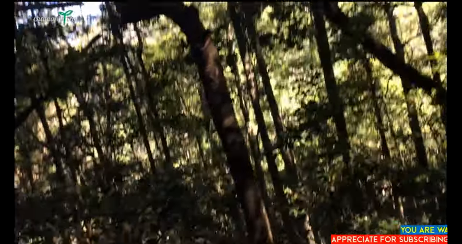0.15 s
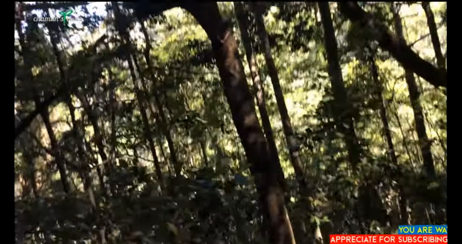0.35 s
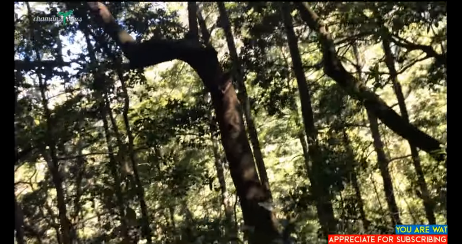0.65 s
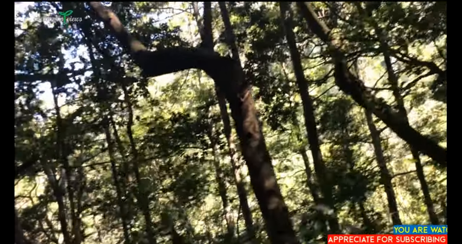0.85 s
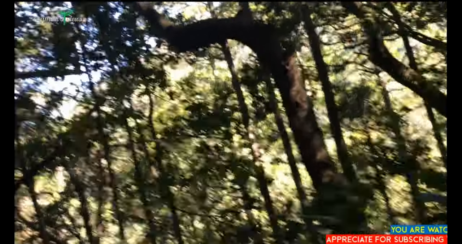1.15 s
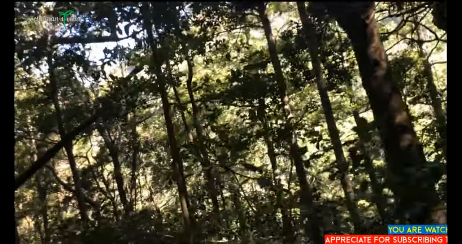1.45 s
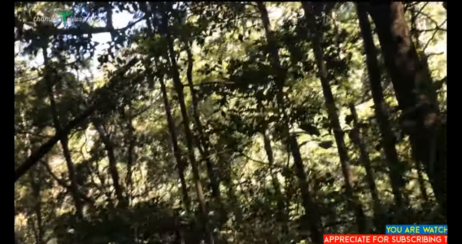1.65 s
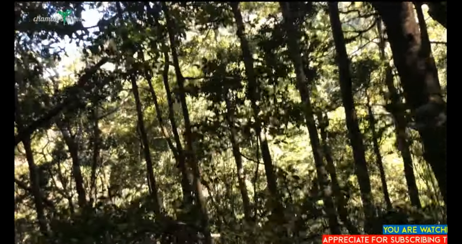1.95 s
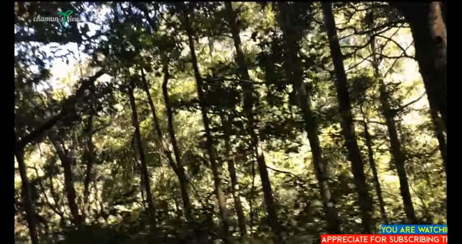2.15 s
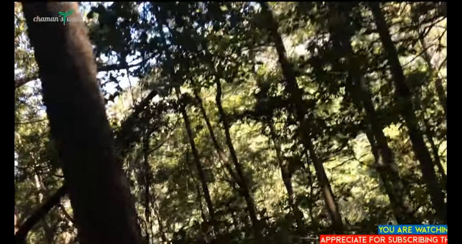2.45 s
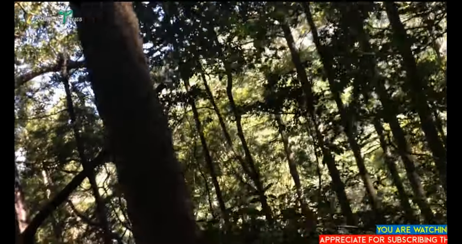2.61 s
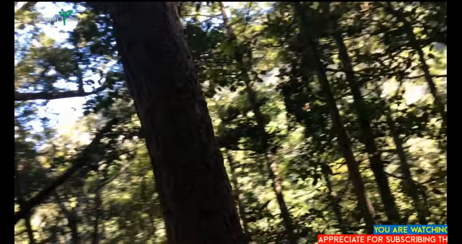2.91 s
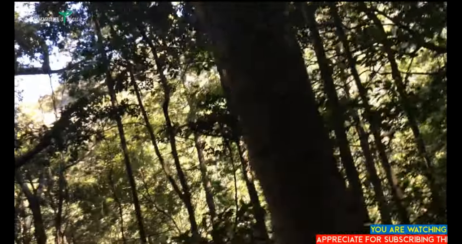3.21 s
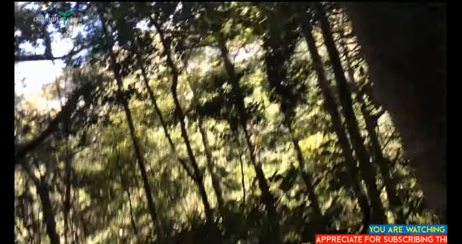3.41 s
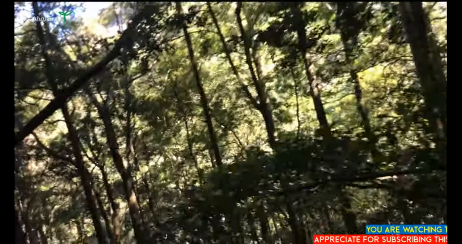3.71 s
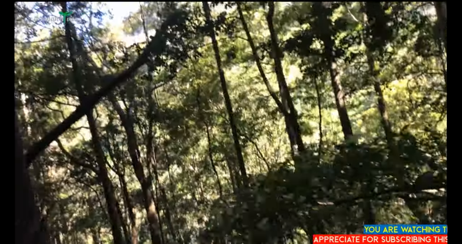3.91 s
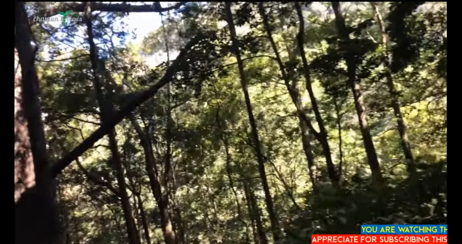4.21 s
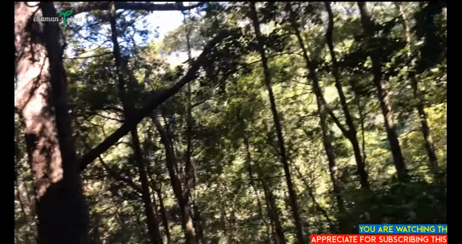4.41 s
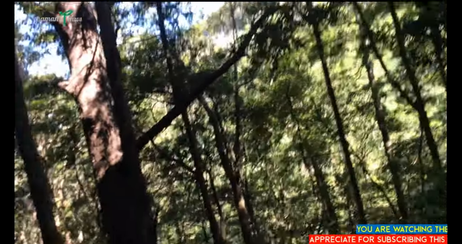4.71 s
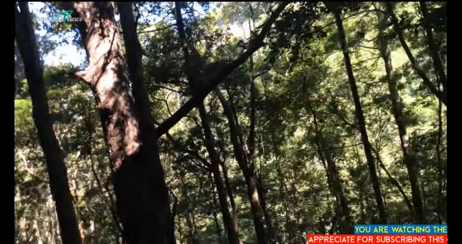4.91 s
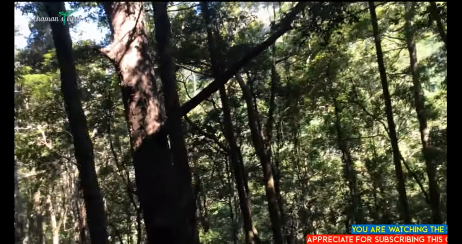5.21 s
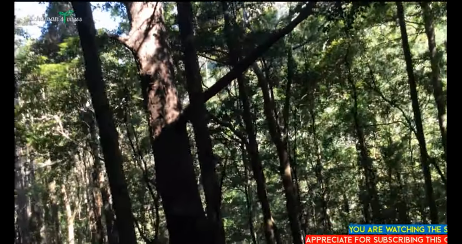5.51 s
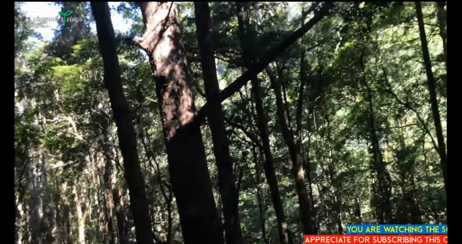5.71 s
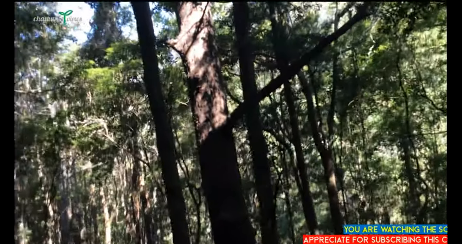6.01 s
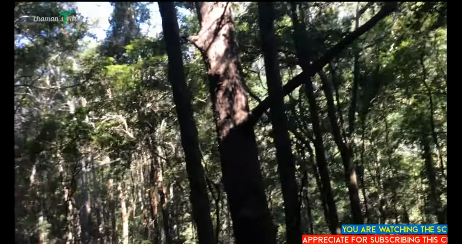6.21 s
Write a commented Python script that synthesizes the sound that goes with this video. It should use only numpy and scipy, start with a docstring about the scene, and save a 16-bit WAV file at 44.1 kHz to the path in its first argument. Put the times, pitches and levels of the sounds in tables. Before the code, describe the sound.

A dense, shrill cicada chorus drones without pause through a rainforest, slowly swelling, with a few faint dull handling thumps on the microphone.

```python
"""A dense, shrill cicada drone runs throughout in a rainforest, swelling all the while, ever more slowly.
Trains of timbal clicks are smeared by forest echoes and shaped by body resonances; the shrillest
group throbs faintly about twice a second. The hand-held camera takes dull bumps, single out-and-back
pulses, a faint three-part scrape of filtered noise and the low rumble of a shifting grip.
Below lie noise bands: a narrow far-off insect hum, canopy air, a low rumble and one soft gust."""
import sys
import numpy as np
from scipy import signal
from scipy.fft import rfft, irfft, next_fast_len
from scipy.io import wavfile
from scipy.ndimage import map_coordinates

SR = 44100
rng = np.random.default_rng(int(sys.argv[2]) if len(sys.argv) > 2 else 0)


def transcribe(signal):
    """Save signal, clipped to [-1, 1], as a 16-bit WAV file at the path in sys.argv[1]."""
    frames = np.atleast_2d(signal).T
    limited = np.clip(frames, -1, 1)
    pcm = np.round(limited * 32767).astype(np.int16)
    wavfile.write(sys.argv[1], SR, pcm)


N = 280035  # length [samples]

# Spectra of the cicada groups, from low to high: (frequency [Hz], relative level per Hz [dB])
LOW_SPECTRUM = [(1300, -58), (1950, -27.5), (2200, -14), (2550, -6), (2790, 0.5), (3030, -0.5),
                (3280, -1.5), (3550, -14), (4200, -67)]
MAIN_SPECTRUM = [(2700, -65), (3150, -9), (3420, -3), (3660, 2.5), (3950, 0.5), (4250, 0.5), (4500, -6),
                 (4800, -30), (5600, -62)]
SHRILL_SPECTRUM = [(3800, -60), (4350, -3), (4660, 2.5), (4950, -2.5), (5260, -5.5), (5540, -6.5),
                   (6000, -12), (6600, -18.5), (7300, -39), (9000, -56)]
OVERTONE_SPECTRUM = [(5000, -45), (6800, -3), (7400, -0.5), (7900, 1.5), (8700, -5), (9400, -5),
                     (10000, -11), (10700, -9), (12500, -12), (13200, -23), (15800, -23)]
# Dull bumps on the camera body: (time [s], peak level [dB], pitch [Hz])
BUMP_EVENTS = [(.151, -48, 64.6), (0.278, -55, 70), (.867, -53, 60), (.94, -61, 65), (1.175, -53, 90),
               (2.822, -47, 78), (3.164, -53, 70), (3.374, -45, 70), (3.64, -51, 55), (3.727, -47, 60),
               (3.83, -47, 65), (3.904, -38, 78), (3.935, -50, 70), (4.012, -50, 55), (4.063, -50, 62),
               (4.163, -53, 80)]
# The three catches of one scrape: (time [s], level [dB], half length [s])
SCRAPE_CATCHES = [(5.047, -52, .006), (5.067, -46.5, .009), (5.126, -53, .005)]
# Spectra of the scraped body and the shifting grip: (frequency [Hz], relative level per Hz [dB])
SCRAPE_SPECTRUM = [(600, -27), (1000, -12), (1200, -9), (1340, -2), (1430, -10), (1530, 2), (1750, -18),
                   (2400, -33)]
GRIP_SPECTRUM = [(20, -8), (40, 0), (80, 1), (160, -20), (400, -50)]
# Spectra of the forest background: (frequency [Hz], relative level per Hz [dB])
HUM_SPECTRUM = [(1100, -45), (1300, -18.5), (1420, -3.5), (1520, -3.5), (1650, 5), (1720, 0.5),
                (1810, -3.5), (2000, -3), (2600, -31)]
AIR_SPECTRUM = [(150, -25), (350, -3.5), (520, -3), (750, 0.5), (1100, -3.5), (1500, -1.5), (4000, -11.5),
                (15000, -33)]
RUMBLE_SPECTRUM = [(20, -24), (45, -1.5), (100, -3.5), (180, 0), (290, -3), (450, -7), (800, -30),
                   (2000, -60)]
GUST_SPECTRUM = [(110, -27), (200, -4.5), (280, -1.5), (400, -9), (600, -12), (1200, -18), (2500, -47)]

# Each cicada group has a starting level [dB] and the gain [dB] that the full swell would add
SWELL_S = 5.16  # time constant of the shared swell [s]
LOW_DB, LOW_SWELL_DB = -37.5, 3.6
MAIN_DB, MAIN_SWELL_DB = -32, 5
SHRILL_DB, SHRILL_SWELL_DB = -36, 2
OVERTONE_DB, OVERTONE_SWELL_DB = -55.5, 7.0
# Throb of the shrill group: period [s], time of one crest [s], swing either way [dB]
THROB_S, THROB_CREST_S, THROB_DB = 0.52, 4.23, 0.2
# Grip rumble: level and unevenness [dB]
GRIP_DB, GRIP_UNEVEN_DB = -75, 1
# Background levels [dB] and the steady fade of the hum [dB/s]
HUM_DB, HUM_FADE_DB_PER_S = -53.5, 0.27
AIR_DB, RUMBLE_DB = -59, -64
# Gust: time of its crest [s], half length [s], level [dB]
GUST_S, GUST_HALF_S, GUST_DB = 1.64, 0.9, -64


def cicadas():
    """Superposition: three resonant groups and a thin overtone sizzle share one exponential swell."""
    t = np.arange(N) / SR
    swell = 1 - np.exp(-t / SWELL_S)
    throb = np.cos(2 * np.pi * (t - THROB_CREST_S) / THROB_S)

    low_db = LOW_DB + LOW_SWELL_DB * swell + 0.4 * wobble(14)
    main_db = MAIN_DB + MAIN_SWELL_DB * swell + 0.5 * wobble(20)
    shrill_db = SHRILL_DB + SHRILL_SWELL_DB * swell + THROB_DB * throb + 0.34 * wobble(14)
    overtone_db = OVERTONE_DB + OVERTONE_SWELL_DB * swell + 0.25 * wobble(12)

    low = amp(low_db) * swarm(LOW_SPECTRUM, click_hz=230.0, scatter=0.12, forest_t60=0.46, count=8)
    main = amp(main_db) * swarm(MAIN_SPECTRUM, click_hz=310.3, scatter=0.08, forest_t60=0.42, count=8)
    shrill = amp(shrill_db) * swarm(SHRILL_SPECTRUM, click_hz=401.0, scatter=0.1, forest_t60=0.44, count=8)
    sizzle = amp(overtone_db) * swarm(OVERTONE_SPECTRUM, click_hz=308.5, scatter=0.1,
                                      forest_t60=0.33, count=8)
    return low + main + shrill + sizzle


def swarm(spectrum, click_hz, scatter, forest_t60, count):
    """Reverberation: each insect's clicks meet dense decaying echoes from trunks and leaves."""
    echo_t = np.arange(SR // 2) / SR
    voices = np.zeros(N)
    for pace, start in rng.standard_normal((count, 2)):
        clicks = timbal(click_hz * np.exp(0.2 * pace), scatter, drift=0.06)
        pulses = (clicks - clicks.mean())[None]
        echoes = rng.standard_normal((2, len(echo_t))) * amp(-60 * echo_t / forest_t60)
        # Drop the first second, so that the echoes have already built up
        one, other = signal.fftconvolve(pulses, echoes, axes=1)[:, SR:SR + N]
        # The echo paths keep changing as the microphone moves among the trees
        shift = np.pi * (start + np.arange(N) / SR)
        voice = unit(one * np.cos(shift) + other * np.sin(shift))
        voices += amp(0.92 * wobble(7.7)) * voice
    return coloured(voices, spectrum)


def timbal(click_hz, scatter, drift):
    """Impulsive excitation: buckling ribs click at a drifting rate, from one second before the start."""
    span = N + SR
    beats = np.arange(int(2 * click_hz * span / SR))
    pace = np.interp(beats, np.linspace(0, len(beats), 60), rng.standard_normal(60))
    jitter = scatter * rng.standard_normal(len(beats))
    gaps_s = np.exp(drift * pace + jitter) / click_hz
    at = (np.cumsum(gaps_s) * SR).astype(int)
    return np.bincount(at[at < span], minlength=span)


def bumps():
    """Heavily damped impact: each bump pushes the camera body once out and back, with no ring."""
    t, out = np.arange(N) / SR, np.zeros(N)
    for time_s, peak_db, hz in BUMP_EVENTS:
        phase = 2 * np.pi * hz * (t - time_s)
        near = np.abs(phase) < 2 * np.pi
        # Slope of a bell curve, scaled to peak at 1
        push = phase[near] * np.exp((1 - phase[near] ** 2) / 2)
        out[near] += amp(peak_db) * push
    return out


def scrape():
    """Friction: brief bell-shaped swells of noise sound through a woody resonance."""
    t = np.arange(N) / SR
    stroke = np.zeros(N)
    for time_s, level_db, half_s in SCRAPE_CATCHES:
        stroke += amp(level_db) * np.exp(-0.5 * ((t - time_s) / half_s) ** 2)
    return stroke * coloured(rng.standard_normal(N), SCRAPE_SPECTRUM)


def grip():
    """Contact noise: the hand shifting on the camera makes a faint, lumpy low rumble."""
    level_db = GRIP_DB + GRIP_UNEVEN_DB * wobble(12)
    return amp(level_db) * coloured(rng.standard_normal(N), GRIP_SPECTRUM)


def forest():
    """Incoherent sources as noise bands: merged far insects, canopy air, a low rumble and one gust."""
    t = np.arange(N) / SR
    hum_db = HUM_DB - HUM_FADE_DB_PER_S * t + 1.15 * wobble(7.4)
    air_db = AIR_DB + 0.36 * wobble(11.0)
    rumble_db = RUMBLE_DB + 1.15 * wobble(8)
    gust_db = GUST_DB + 1.7 * wobble(7.9)
    rise_and_fall = np.exp(-0.5 * ((t - GUST_S) / GUST_HALF_S) ** 2)

    hum = amp(hum_db) * coloured(rng.standard_normal(N), HUM_SPECTRUM)
    air = amp(air_db) * coloured(rng.standard_normal(N), AIR_SPECTRUM)
    rumble = amp(rumble_db) * coloured(rng.standard_normal(N), RUMBLE_SPECTRUM)
    gust = rise_and_fall * amp(gust_db) * coloured(rng.standard_normal(N), GUST_SPECTRUM)
    return hum + air + rumble + gust


def coloured(x, points):
    """Linear filtering: x shaped by (Hz, dB) points on a log-frequency axis, at rms 1."""
    size = next_fast_len(N + 8192)
    hz, db = np.transpose(points)
    log_hz = np.log(np.fft.rfftfreq(size, 1 / SR) + 1)  # +1 avoids log(0)
    gain = amp(np.interp(log_hz, np.log(hz), db))
    return unit(irfft(rfft(x, size) * gain, size)[:N])


def wobble(rate):
    """Slow random modulation: a smooth curve through `rate` random knots a second."""
    knots = rng.standard_normal(int(N * rate / SR) + 4)
    return map_coordinates(knots, [np.arange(N) * rate / SR])


def amp(db):
    """Logarithmic level: decibels to amplitude gain."""
    return 10 ** (np.asarray(db) / 20)


def unit(x):
    """Effective value: x scaled to rms 1."""
    return x / np.sqrt(np.mean(x ** 2) + 1e-20)


def scene():
    """Superposition: all the sound pressures add at one microphone."""
    return (cicadas() + bumps() + scrape() + grip() + forest())[None]


def record(dry):
    """Band limiting: the camera drops the deepest bass and keeps nothing from its top limit up."""
    bass_cut_hz, top_hz = 36, 15800
    size = next_fast_len(N + 8192)
    hz = np.fft.rfftfreq(size, 1 / SR)
    bass = 1 - 1 / (1 + (hz / bass_cut_hz) ** 4)
    return irfft(rfft(dry, size) * bass * (hz < top_hz), size)[:, :N]


dry = scene()
out = record(dry)
transcribe(out)
```